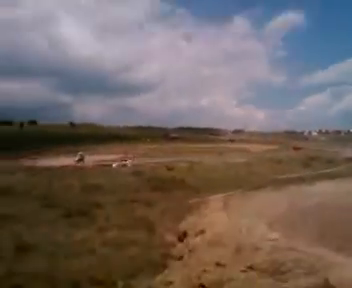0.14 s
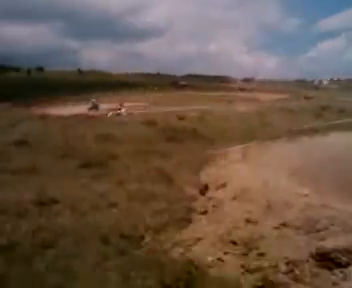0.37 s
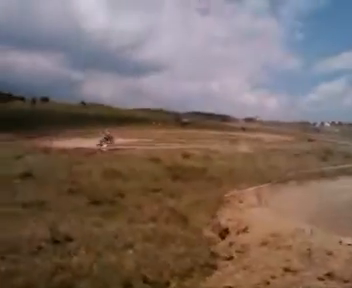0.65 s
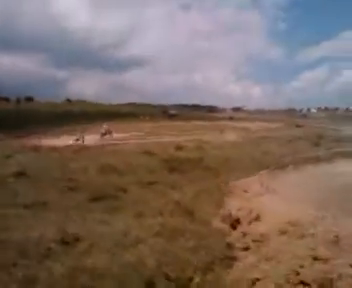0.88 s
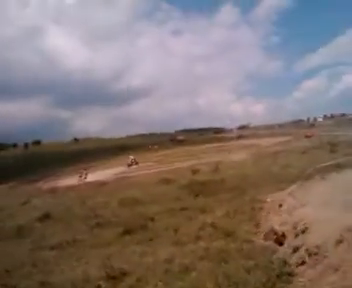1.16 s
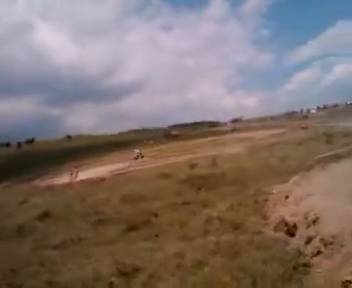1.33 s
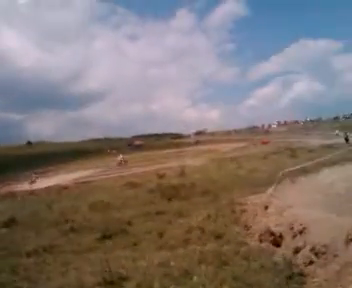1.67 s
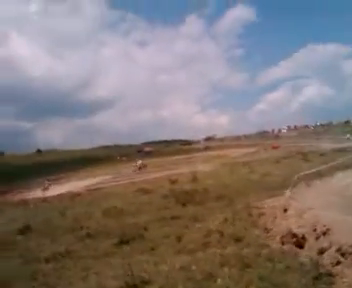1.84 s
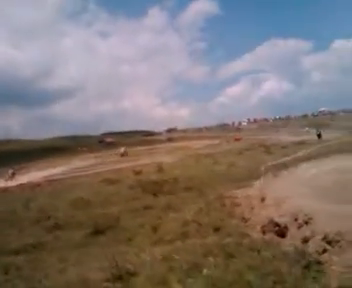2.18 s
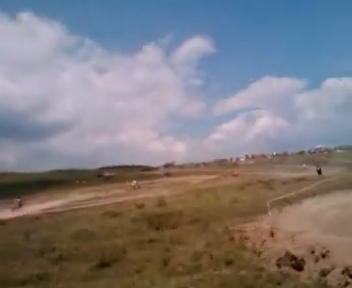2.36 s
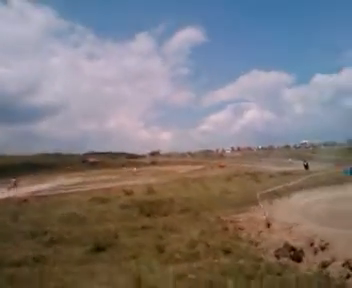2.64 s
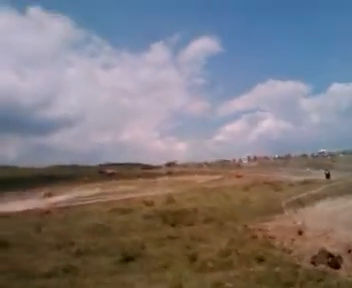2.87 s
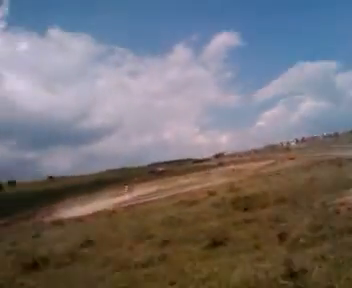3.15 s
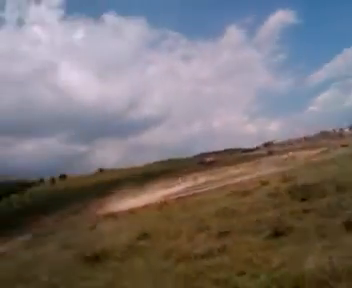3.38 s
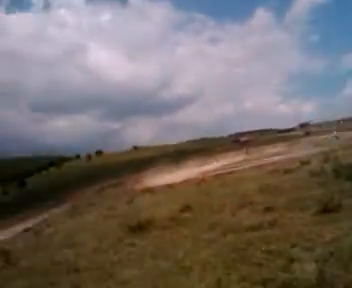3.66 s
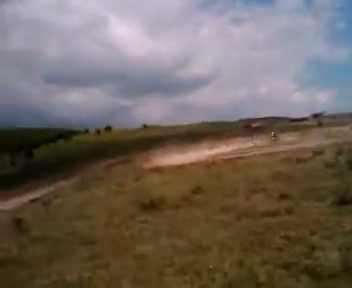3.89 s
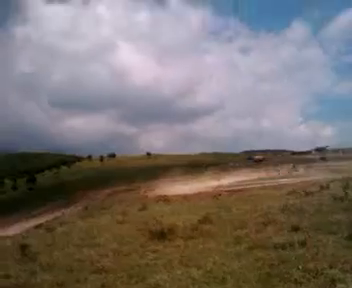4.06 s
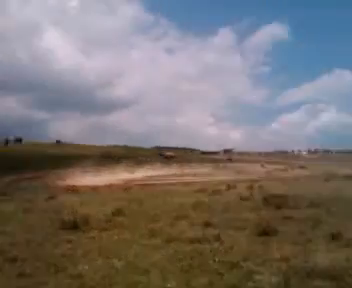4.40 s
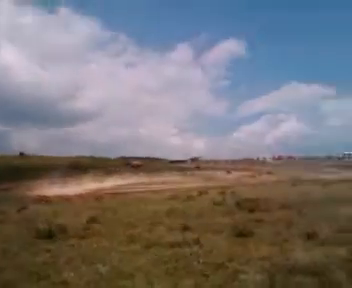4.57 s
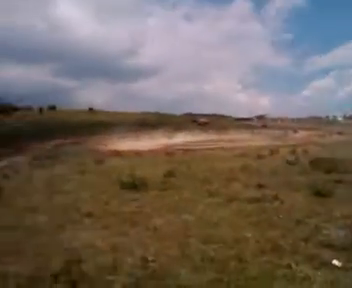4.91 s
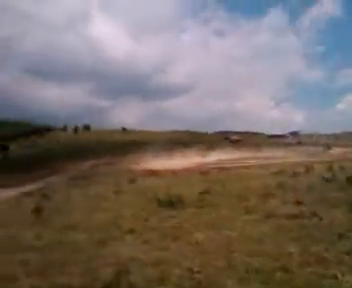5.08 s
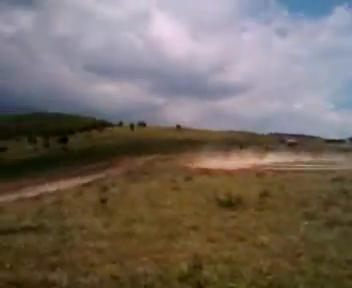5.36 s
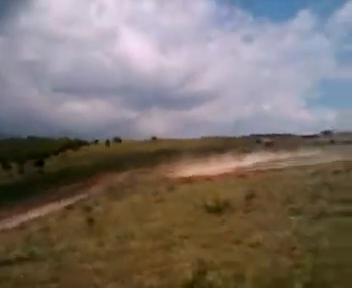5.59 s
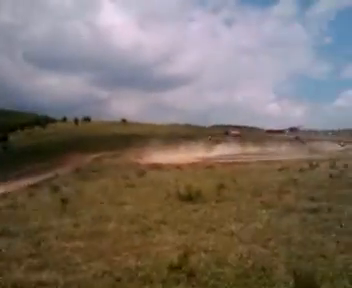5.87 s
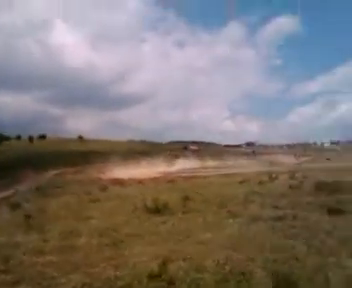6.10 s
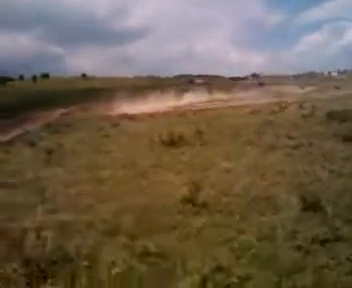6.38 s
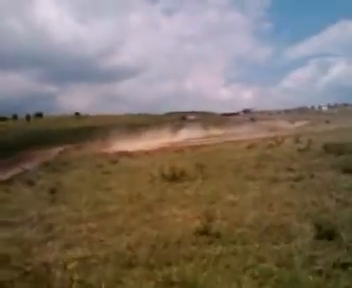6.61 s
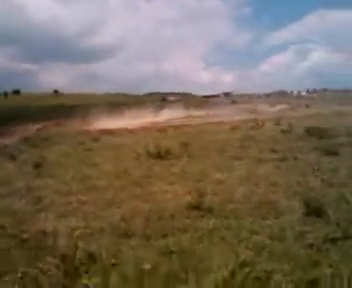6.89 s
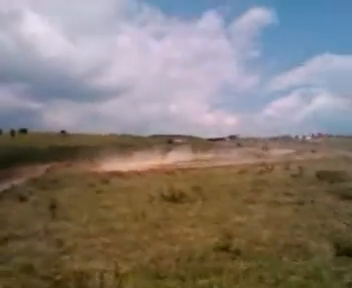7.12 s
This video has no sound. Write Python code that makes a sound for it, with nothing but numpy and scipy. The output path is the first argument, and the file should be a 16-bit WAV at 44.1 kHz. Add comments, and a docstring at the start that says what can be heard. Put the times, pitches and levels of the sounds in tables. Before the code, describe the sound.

A coarse, buzzing motocross engine dominates, surging in pitch through two gears with a distant pack droning and whining behind. After about three seconds, low wind buffets shake the cheap, slightly overloaded microphone. The engine abruptly drops to a quiet coast, leaving mostly wind, then a thinner, farther bike crackles in bursts and falls away. Open ground, dry sound, with a short slap off a slope.

```python
"""Single-cylinder dirt bikes on a field track: every firing is a crack and a rasp of exhaust gas.
The nearest bike pulls through two gears and shuts off, then one opens up farther away; both are noise blasts
and pipe rings fired by the engine cycle. Behind them: a rival's thin cracks, a deeper engine summed from
firing orders, and the pack as filtered noise. Gusts of shaped noise buffet a small narrow-band microphone,
which saturates softly; peaks are then cut flat at a fixed ceiling, which adds faint treble ticks."""
import sys
import numpy as np
from scipy.fft import rfft, irfft, next_fast_len
from scipy.io import wavfile
from scipy.ndimage import uniform_filter1d, map_coordinates

SR = 44100
rng = np.random.default_rng(int(sys.argv[2]) if len(sys.argv) > 2 else 0)


def put_to_file(sound):
    """Save the sound as 16-bit audio at rate SR, in the file named by the first command-line argument."""
    columns = np.atleast_2d(sound).T  # one column per channel
    safe = np.clip(columns, -1, 1)
    whole_steps = np.round(safe * 32767)
    wavfile.write(sys.argv[1], SR, whole_steps.astype(np.int16))


N = 319475


def amp(db):
    """Decibels to gain."""
    return 10 ** (np.asarray(db) / 20)


def unit(x):
    """Scale to rms 1."""
    return x / np.sqrt(np.mean(x ** 2) + 1e-20)


def curves(rows):
    """One value per sample for each column after the time."""
    time_s, *columns = np.transpose(rows)
    return [np.interp(np.arange(N) / SR, time_s, column) for column in columns]


def wobble(knots_per_s):
    """Smooth random curve through normally distributed knots."""
    knots = rng.standard_normal(int(N * knots_per_s / SR) + 4)
    return map_coordinates(knots, [np.arange(N) * knots_per_s / SR])


def coloured(x, points):
    """Causal minimum-phase filter with the gain of the (Hz, dB) points."""
    size = 2 * next_fast_len(N // 2 + SR // 8)
    hz, db = np.transpose(points)
    bin_hz = np.fft.rfftfreq(size, 1 / SR)
    gain = amp(np.interp(np.log(bin_hz + 1), np.log(hz), db))
    cepstrum = irfft(np.log(gain))
    # fold the cepstrum to positive time
    cepstrum[1:size // 2] *= 2
    cepstrum[size // 2 + 1:] = 0
    return irfft(rfft(x, size) * np.exp(rfft(cepstrum)), size)[:N]


def steady(x, window_s):
    """Even out the running rms towards 1; a floor keeps quiet passages from being blown up."""
    size = int(window_s * SR)
    power = uniform_filter1d(uniform_filter1d(x ** 2, size), size)
    return x / np.sqrt(np.abs(power) + np.mean(x ** 2) / 20)


def firings(run):
    """Sample of each firing: one whenever the engine completes a cycle."""
    time_s, rate_hz = np.transpose(run)[:2]
    at = np.arange(max(0, int(time_s[0] * SR)), min(N, int(time_s[-1] * SR)))
    cycles = np.cumsum(np.interp(at / SR, time_s, rate_hz)) / SR
    return at[np.diff(np.floor(cycles), prepend=-1) > 0]


def blasts(at, length_ms, tail_db, scatter_db, tail_ms, rise_ms):
    """Envelope of each firing, one row each: a short blast, a tail and a stray reflection a few ms later, no
    two alike."""
    ms = np.arange(SR // 30) * 1000 / SR
    strength, stretch, lag, stray_size = rng.standard_normal((len(at), 4)).T[:, :, None]
    length = length_ms * np.exp(0.12 * stretch)
    stray_at_ms = 7 * np.exp(0.35 * lag)
    stray = amp(1 + 2.5 * stray_size) * np.exp(-((ms - stray_at_ms) / 1.1) ** 2)
    shape = np.exp(-(ms / length) ** 2) + amp(tail_db) * (np.exp(-ms / tail_ms) + stray)
    shape *= 1 - np.exp(-(ms / rise_ms) ** 2)
    # energy follows the firing interval, so that power does not depend on the rate
    size = np.sqrt(np.gradient(at))[:, None] * amp(scatter_db * strength)
    return shape * size / np.linalg.norm(shape, axis=1, keepdims=True)


def laid(at, rows):
    """Sum one short sound per firing into a track of rms 1."""
    where = at[:, None] + np.arange(rows.shape[1])
    return unit(np.bincount(where.ravel(), rows.ravel(), N)[:N])


def gas(at, shape):
    """Each blast is a shock front and a jet of turbulence: two tracks of rms 1."""
    front = at + shape.argmax(axis=1) // 2
    shock = -np.bincount(front, np.linalg.norm(shape, axis=1), N)[:N]
    jet = laid(at, shape * rng.standard_normal(shape.shape))
    return unit(shock), jet


def ring(at, shape, hz, spread):
    """The pipe rings through each blast, at a slightly different pitch every time."""
    detune, phase = rng.standard_normal((len(at), 2)).T[:, :, None]
    t = np.arange(shape.shape[1]) / SR
    pitch_hz = np.reshape(hz, (-1, 1)) * np.exp(spread * detune)
    return laid(at, shape * np.sin(2 * np.pi * (pitch_hz * t + phase)))


def lead_bikes():
    """Exhaust blasts ring as a high rasp, a mid bark and a low thump; rasp and bark echo off the slope."""
    # firing rate through each pull and the coast between: time_s, rate_hz
    first_gear = [(0.005, 23.78), (0.226, 33.27), (0.691, 38.17), (0.732, 30.98), (0.815, 31.59),
                  (1.179, 46.07), (1.602, 52.99), (1.849, 66.04), (1.986, 60.18), (2.207, 68.8)]
    second_gear = [(2.257, 45.92), (2.448, 45.75), (2.689, 56.23), (2.815, 47.37), (3.117, 42.56),
                   (3.332, 54.65), (3.585, 68.81), (3.741, 61.98), (3.789, 55.63), (4.007, 59.16),
                   (4.233, 67.64), (4.335, 81.38)]
    coasting = [(4.559, 49.46), (5.0, 44.93), (5.36, 45.63)]
    far_pull = [(5.403, 26.77), (5.542, 29.11), (5.669, 38.67), (5.92, 32.04), (6.066, 44.07),
                (6.244, 43.84), (6.342, 38.67), (6.694, 50.93), (6.89, 32.22), (7.24, 45.52)]
    # what distance and heading leave at the cruising rate: time_s, rasp_db, bark_db (re rasp)
    first_gear_heard = [(0, -25.5, 1), (.42, -32, 9), (.49, -16.5, -7), (.82, -21, -2.5), (1.13, -15.5, -3),
                        (1.58, -15, -5), (2.13, -17, -3.5), (2.2, -24, 0.5)]
    second_gear_heard = [(2.258, -15.5, -6), (2.6, -14.5, -4.5), (3.02, -22, 1), (3.2, -15, -1.5),
                         (3.541, -17.5, -5), (3.739, -22, -9.5), (4.13, -13.5, -6), (4.269, -19, 0),
                         (4.36, -24.5, 1.5)]
    coasting_heard = [(4.401, -31.5, 1.5), (4.46, -27, 0.5), (4.56, -38.5, 7), (4.84, -36.5, -4),
                      (5.06, -31.5, -4), (5.331, -49.5, 5)]
    far_pull_heard = [(5.4, -26.5, -10), (5.59, -24, -0.5), (5.71, -33.5, -4), (5.8, -21, -14),
                      (6.079, -19.5, -15), (6.219, -25, -11), (6.42, -25.5, -14), (6.51, -33.5, 4),
                      (6.67, -29.5, -2.5), (6.77, -50, -1), (7.0, -32, -36.5), (7.24, -38, -12.5)]
    # load lengthens each blast and drowns its thump:
    # time_s, blast_ms (before bark scaling), tail_db (before trim), thump_db (re bark)
    load = [(0, 2.1, -19, -1.5), (.8, 2, -12, -8.5), (1.25, 3.6, -5.5, -17), (2.1, 7, -6, -26.5),
            (2.3, 4.2, -12, -18.5), (4.33, 2.9, -18.5, -12), (4.42, 1.5, -16, -29), (5.2, 1.6, -13, -6),
            (5.45, 1.6, -21, -14)]
    # the slope throws every blast back: time_s, delay_ms, echo_db (re direct)
    echo = [(0, 3.3, -5), (1.25, 7.4, -15), (2.3, 7.1, -16), (4.33, 6, -16.5), (5.45, 4, -12)]
    # filter gain of each part: freq_hz, gain_db
    rasp_colour = [(500, -35), (1400, -33), (2100, -5.5), (2600, 0), (2950, -2.5), (3200, 4), (3450, -8.5),
                   (4200, -8.5), (6000, -29)]
    bark_colour = [(200, -26), (600, -3.5), (950, -6.5), (1300, -2), (1800, 4), (2200, 1.5), (2700, -9.5),
                   (4000, -18.5)]
    thump_colour = [(25, -40.5), (70, -13), (150, -17.5), (250, 4), (400, 4.5), (600, 1.5), (1000, -16.5),
                    (3000, -42)]
    cruise_rate_hz, rasp_db_per_octave, bark_db_per_octave = 50, 13.5, -9
    tuned_rate_hz, tuned_width_hz, tuned_db, nasal_db = 78, 5, 3.5, 7
    tail_trim_db = -1.5

    runs = first_gear, np.vstack([second_gear, coasting]), far_pull
    rate_hz = curves(np.vstack(runs))[0]
    revs = rate_hz / cruise_rate_hz
    heard = np.vstack([first_gear_heard, second_gear_heard, coasting_heard, far_pull_heard])
    rasp_db, bark_db = curves(heard)
    rasp_db = rasp_db + rasp_db_per_octave * np.log2(revs)
    # near its tuned rate the pipe takes over the bark: louder, and nasal instead of noisy
    tuned = np.exp(-((rate_hz - tuned_rate_hz) / tuned_width_hz) ** 2)
    bark_db = bark_db + bark_db_per_octave * np.log2(revs) + tuned_db * tuned

    length_ms, tail_db, thump_db = curves(load)
    # hotter gas sharpens the rings: the rasp with the blast length, the bark with the revs
    rasp_hz = 3064.5 * (length_ms / 3.2) ** 0.08
    bark_hz = 1920 * revs ** 0.18
    sharp = 1.0 / length_ms  # short blasts are mostly shock front, and less even

    delay_ms, echo_db = curves(echo)
    late = np.arange(N) - delay_ms * SR / 1000

    def echoed(x):
        """Add the slope's delayed copy and even out the level."""
        return steady(x + amp(echo_db) * np.interp(late, np.arange(N), x), window_s=0.25)

    at = np.concatenate([firings(run) for run in runs])
    row = at[:, None]
    row_tail_db = tail_db[row] + tail_trim_db
    uneven = np.sqrt(sharp[row])
    # the bark and the rasp of the gas jet each swell and die in their own way
    low = blasts(at, 0.85 * length_ms[row], row_tail_db, scatter_db=2.1 * uneven, tail_ms=9, rise_ms=0.8)
    high = blasts(at, length_ms[row], row_tail_db, scatter_db=2 * uneven, tail_ms=10, rise_ms=1.2)

    shock, jet = gas(at, low)
    bark_ring = ring(at, low, bark_hz[at], spread=0.12 * (1 - tuned[row] / 2))
    bark_ring = amp(nasal_db * tuned) * bark_ring
    bark_gas = unit(coloured(jet + 0.38 * sharp * shock, bark_colour))
    bark = echoed(bark_gas + 0.82 * bark_ring)
    thump = unit(coloured(jet + 1.9 * shock, thump_colour))

    shock, jet = gas(at, high)
    rasp_gas = unit(coloured(jet + 0.076 * sharp * shock, rasp_colour))
    rasp = echoed(rasp_gas + 0.88 * ring(at, high, rasp_hz[at], spread=0.0692))

    body = bark + amp(thump_db) * thump
    return amp(rasp_db + hard_firings(at)) * (rasp + amp(bark_db) * body)


def hard_firings(at):
    """Now and then a richer charge bangs louder, for the length of one firing: dB over time."""
    # firings that crack harder than their neighbours: time_s, extra_db
    hard = [(0.086, 2), (0.507, 2), (.819, 2.5), (1.159, 2), (2.282, 3), (3.112, 2), (4.762, 3), (5.582, 3),
            (5.609, 2.5), (6.052, 2), (6.077, 5.5), (6.357, 5.5), (6.409, 9), (6.969, 3), (7.125, 5)]
    extra_db = np.zeros(len(at))
    for time_s, db in hard:
        extra_db[np.abs(at / SR - time_s).argmin()] += db
    latest = np.searchsorted(at, np.arange(N), "right") - 1
    return extra_db[np.maximum(latest, 0)]


def rival_bike():
    """Thinner, shorter cracks that ring the pipe, in two separate runs."""
    # one list per run: time_s, rate_hz, level_db
    rival_runs = [
        [(0.02, 81, -25.5), (.15, 80, -29), (.28, 82, -27.5), (.42, 74, -24), (.57, 88, -37), (.72, 52, -57)],
        [(2.484, 38, -33), (2.52, 37, -23.5), (2.6, 39, -19), (2.66, 39, -23), (2.74, 42, -24),
         (2.84, 34, -39.5)],
    ]
    # pipe ring of each run: ring_hz, ring_db (re crack)
    rival_rings = [(1670, -18), (1280, -5.5)]
    # exhaust filter: freq_hz, gain_db
    crack_colour = [(150, -23.5), (500, -5), (900, -9.5), (1300, -0.5), (1900, 4), (2500, -11),
                    (3300, -6.5), (4500, -19)]
    out = np.zeros(N)
    for run, (ring_hz, ring_db) in zip(rival_runs, rival_rings):
        level_db = curves(run)[1]
        at = firings(run)
        shape = blasts(at, length_ms=1.3, tail_db=-17.5, scatter_db=2.5, tail_ms=1.8, rise_ms=0.4)
        shock, jet = gas(at, shape)
        crack = unit(coloured(jet + 0.46 * shock, crack_colour))
        crack = crack + amp(ring_db) * ring(at, shape, ring_hz, spread=0.12)
        # rms 1 over the whole track becomes rms 1 over the run
        out += amp(level_db) * crack * np.sqrt((at[-1] - at[0]) / N)
    return out


def deep_engine():
    """A well-silenced bike: only its low orders come through, and one of them booms in the silencer."""
    # the hum rolls off: time_s, rate_hz, boom_db, others_db
    hum = [(0, 88, -26, -32.5), (.09, 74, -44, -37), (.13, 82, -23, -38), (.18, 85.5, -27.5, -34.5),
           (.3, 82, -26.5, -40), (.35, 71, -45, -32.5), (.54, 71.5, -44.5, -31.5), (.6, 71.5, -37, -40),
           (.9, 63, -58.5, -55.5)]
    # the other low orders: order (multiple of the firing rate), level_db (re others_db)
    silencer = [(2, -11), (4, 0), (5, -1), (6, -5), (7, -10)]
    boom_order = 3
    rate_hz, boom_db, others_db = curves(hum)
    cycle = 2 * np.pi * np.cumsum(rate_hz * (1 + 0.008 * wobble(30))) / SR
    others = sum(amp(db + 1.5 * wobble(18)) * np.sin(order * cycle) for order, db in silencer)
    after_s = np.maximum(np.arange(N) / SR - hum[-1][0], 0)
    gone = np.exp(-after_s * 10)
    return gone * (amp(boom_db) * np.sin(boom_order * cycle) + amp(others_db) * others)


def pack():
    """Many far engines blur into a drone and a whine: filtered noise with a fluttering level."""
    # time_s, drone_db, whine_db
    levels = [(0, -35, -31), (.45, -36.5, -28), (.85, -38, -30.5), (1.5, -34.5, -21), (2.1, -34.5, -25.5),
              (2.23, -43.5, -22), (2.33, -33, -29.5), (3, -35.5, -25.5), (3.6, -23.5, -17.5),
              (4.38, -36.5, -30.5), (5.5, -43, -40.5), (6.1, -44.5, -29.5), (6.5, -41.5, -35),
              (6.9, -47.5, -44.5), (7.24, -40, -32)]
    # filter gain of each part: freq_hz, gain_db
    drone_colour = [(25, -33.5), (65, -11.5), (140, -8), (270, -3.5), (450, -2), (800, -11), (1500, -13),
                    (3000, -29.5)]
    whine_colour = [(400, -45.5), (1000, -15.5), (1800, -5.5), (2400, -2.5), (3100, 3), (3500, -3.5),
                    (4200, -6.5), (6000, -31.5)]
    drone_db, whine_db = curves(levels)

    def blur(colour):
        """Noise with slow and fast level wobbles, coloured, rms 1."""
        flutter_db = 1.7 * wobble(10) + 3.8 * wobble(130)
        return unit(coloured(amp(flutter_db) * rng.standard_normal(N), colour))

    return amp(drone_db) * blur(drone_colour) + amp(whine_db) * blur(whine_colour)


def wind():
    """Eddies tumble over the microphone port in lumps; strong gusts flutter more, buffets thud and crackle."""
    # single buffets: time_s (thud centres 4 ms later), level_db (thud 5 dB below),
    # centre_hz, crackle_db (re level_db)
    buffets = [(3.078, -9, 299, -19), (3.15, -8, 306, -5.5), (3.327, -5, 387, -10), (3.529, -7.5, 264, -13),
               (3.574, -4.5, 427, -16.5), (3.685, -7.5, 320, -7.5), (3.834, -3.5, 347, -19.5),
               (3.99, -5.5, 366, -11.5), (4.165, -6.5, 377, -21.5), (4.247, -8, 373, -18.5),
               (4.856, -11, 282, -24), (5.015, -5.5, 330, -34), (5.04, -8.5, 450, -33),
               (5.153, -17.5, 318, -13.5), (5.223, -6, 406, -25), (5.242, -13, 267, -15),
               (5.681, -11, 258, -15.5), (5.703, -6.5, 363, -13.5), (6.186, -13, 350, -8.5),
               (6.228, -16.5, 296, -1.5), (6.248, -16.5, 307, -3), (6.707, -14.5, 294, -36),
               (6.724, -9.5, 312, -27), (6.846, -6.5, 280, -27), (6.917, -10.5, 373, -26.5)]
    # filter gain of each part: freq_hz, gain_db
    gust_colour = [(25, -32.5), (60, -25), (150, -18.5), (200, -5.5), (260, 1.5), (360, -1), (520, -7.5),
                   (750, -16.5), (1200, -33.5), (2500, -38)]
    flutter_colour = [(200, -11), (450, 8.5), (800, 9), (1200, -1.5), (2000, -16), (4000, -44.5)]
    t = np.arange(N) / SR
    gust_db = 20 * np.log10(gusts())
    rumble = coloured(amp(5 * wobble(70)) * rng.standard_normal(N), gust_colour)
    rumble = steady(rumble, window_s=0.05)
    flutter = coloured(amp(2.8 * wobble(160)) * rng.standard_normal(N), flutter_colour)
    flutter = steady(flutter, window_s=0.019)
    crackle = unit(coloured(rng.standard_normal(N), flutter_colour))
    thuds = np.zeros(N)
    for time_s, level_db, hz, crackle_db in buffets:
        near = np.abs(t - time_s) < 1 / 20
        age_s = t[near] - time_s - 0.004
        push = np.exp(-(age_s * hz / 1.05) ** 2) * np.cos(2 * np.pi * (age_s * hz + rng.random()))
        burst = np.exp(-(age_s / 0.0037) ** 2) * crackle[near]
        thuds[near] += amp(level_db - 5) * push + amp(level_db + crackle_db) * burst
    return amp(gust_db) * (rumble + amp(0.73 * gust_db - 3.5) * flutter) + thuds


def gusts():
    """Each gust rises fast, sags while it blows and dies away: gain over time."""
    # start_s, length_s, level_db (at the start)
    gust_times = [(2.822, 0.017, -26.5), (2.88, 0.029, -29.5), (3.076, .09, -25.5), (3.222, 0.3, -24.5),
                  (3.473, .27, -23), (3.826, .035, -27.5), (3.923, 0.084, -28), (4.075, .04, -23),
                  (4.16, 0.073, -29.5), (4.329, .06, -25), (4.565, 0.014, -26), (4.65, 0.15, -35),
                  (4.851, 0.0052, -23), (4.985, .18, -28), (5.226, 0.08, -25), (5.356, .06, -25),
                  (5.503, .11, -37.5), (5.69, 0.056, -21), (5.769, 0.099, -25.5), (6.163, .11, -22),
                  (6.292, .13, -26.5), (6.483, 0.018, -27.5), (6.565, 0.045, -29), (6.702, 0.077, -22),
                  (6.81, 0.15, -29), (7.031, 0.03, -29.5), (7.179, 0.034, -29.5)]
    attack_s, release_s, sag_db_per_s = 0.008, 0.017, 5
    t = np.arange(N) / SR
    gain = np.zeros(N)
    for start_s, length_s, level_db in gust_times:
        before = np.maximum(start_s - t, 0) / attack_s
        after = np.maximum(t - start_s - length_s, 0) / release_s
        sagged_db = level_db - sag_db_per_s * np.clip(t - start_s, 0, length_s)
        gain = np.maximum(gain, amp(sagged_db) * np.exp(-np.minimum(before + after, 20)))
    return gain


def scene():
    """Bikes and wind at one microphone."""
    return (lead_bikes() + rival_bike() + deep_engine() + pack() + wind())[None]


def record(dry):
    """Soft saturation and a narrow band, then peaks cut flat at a fixed ceiling: faint treble ticks."""
    # microphone response: freq_hz, gain_db
    microphone = [(20, -12.5), (45, 2), (3300, -1), (3480, -2), (3650, -10.5), (4000, -18), (4400, -28.5),
                  (4750, -46.5), (5300, -94.5)]
    ceiling, top_hz = 0.68, 15870
    pressed = dry[0] / (1 + np.abs(dry[0] / 0.55) ** 4) ** (1 / 4)
    cut = np.clip(coloured(pressed, microphone), -ceiling, ceiling)
    passed = np.fft.rfftfreq(N, 1 / SR) < top_hz
    return irfft(rfft(cut) * passed, N)[None]


dry = scene()
out = record(dry)
put_to_file(out)
```